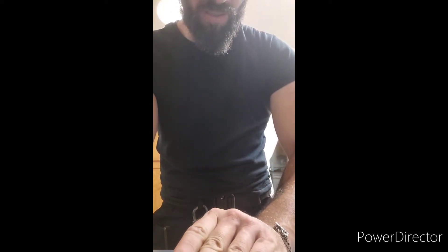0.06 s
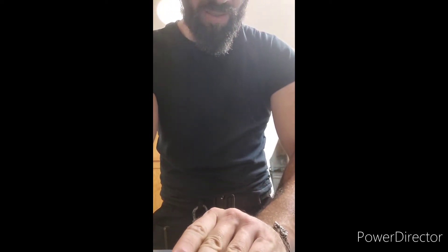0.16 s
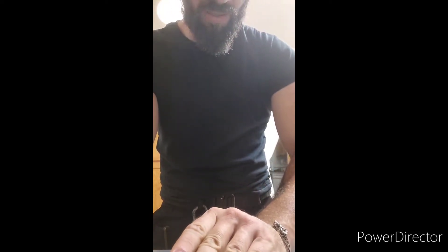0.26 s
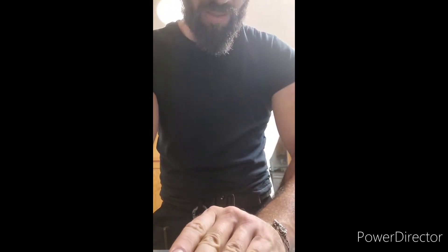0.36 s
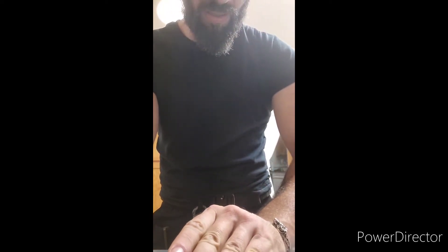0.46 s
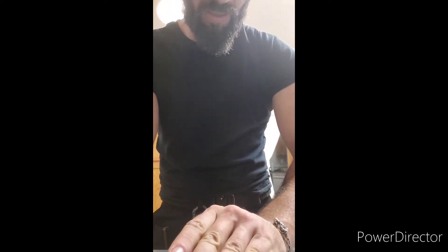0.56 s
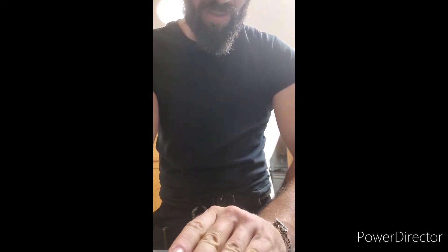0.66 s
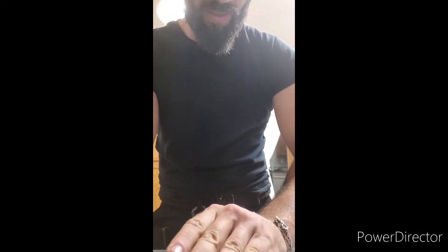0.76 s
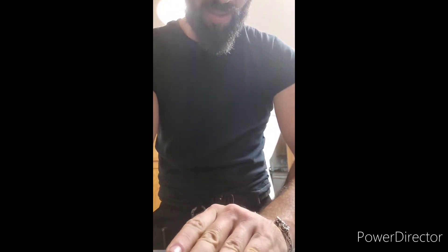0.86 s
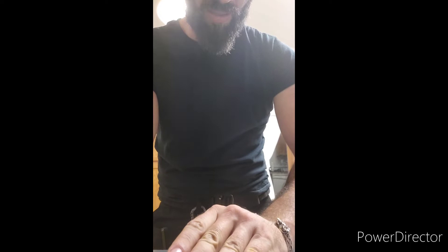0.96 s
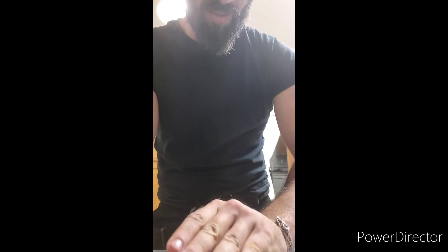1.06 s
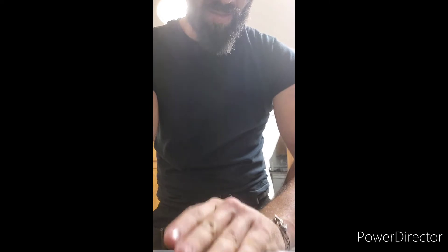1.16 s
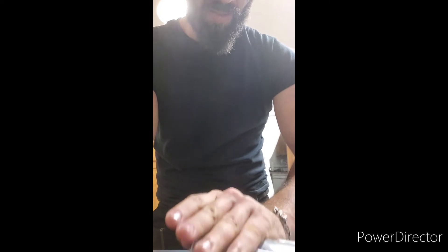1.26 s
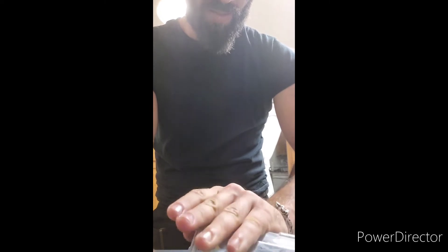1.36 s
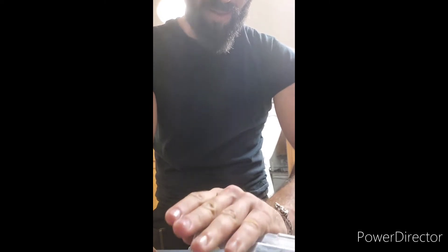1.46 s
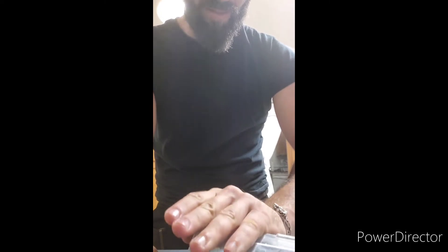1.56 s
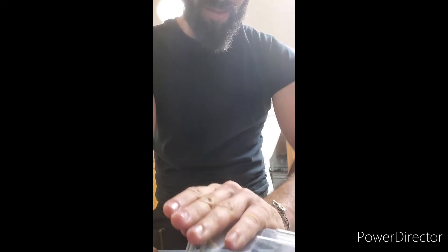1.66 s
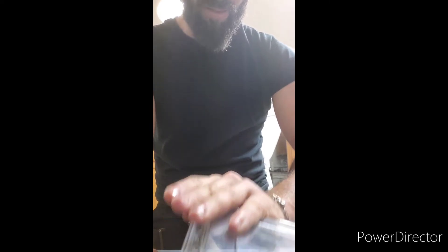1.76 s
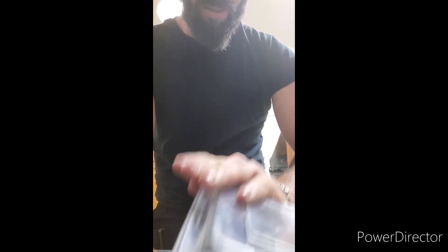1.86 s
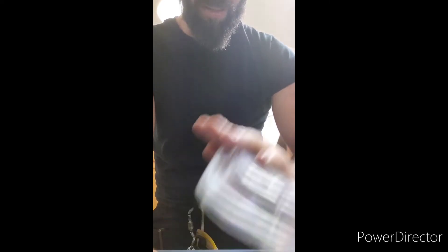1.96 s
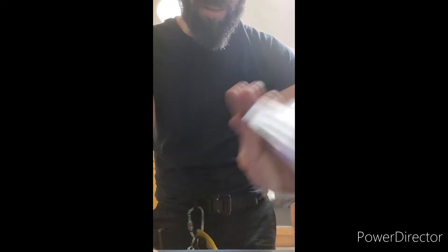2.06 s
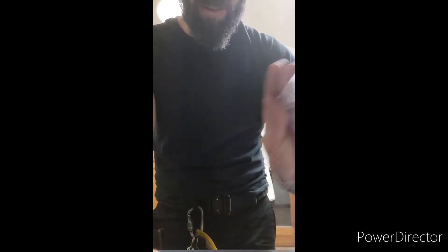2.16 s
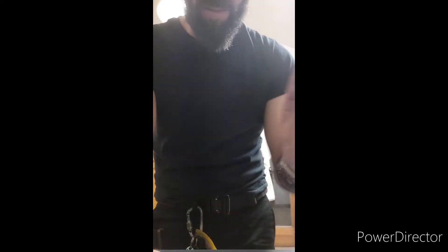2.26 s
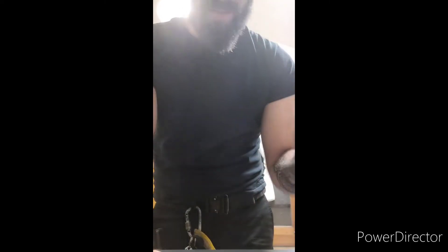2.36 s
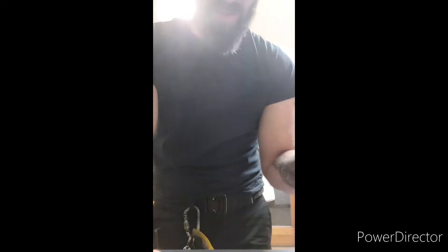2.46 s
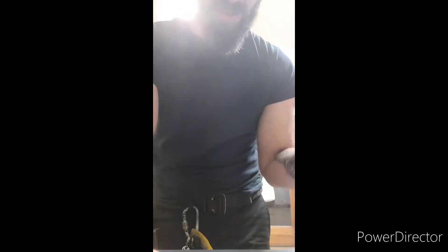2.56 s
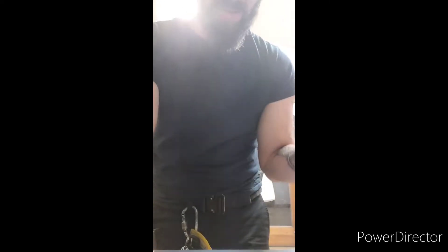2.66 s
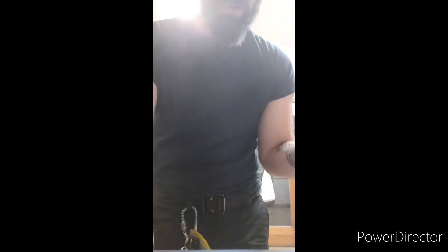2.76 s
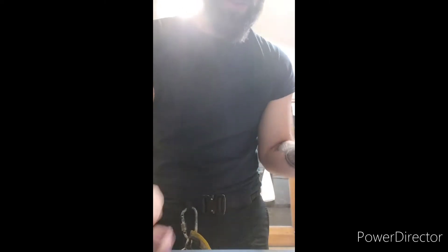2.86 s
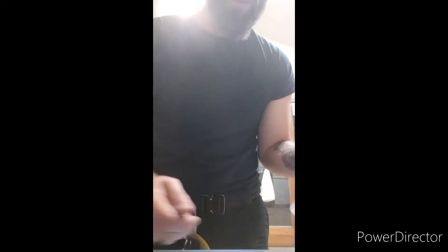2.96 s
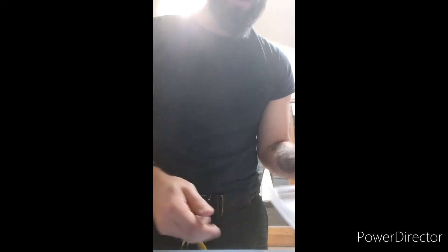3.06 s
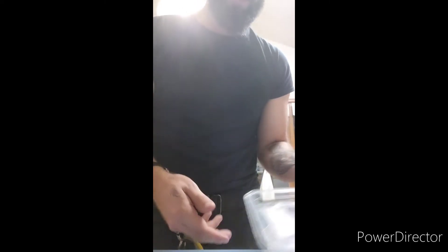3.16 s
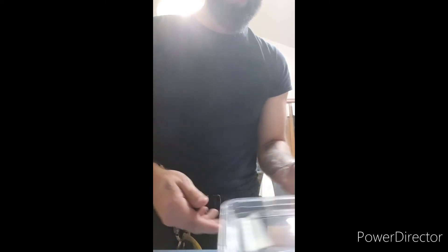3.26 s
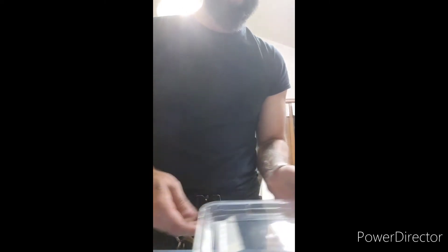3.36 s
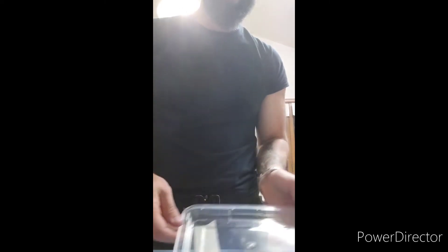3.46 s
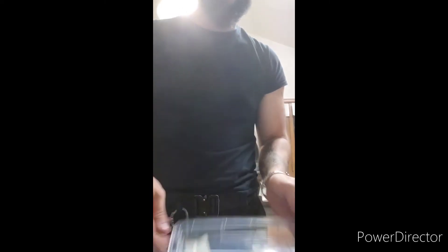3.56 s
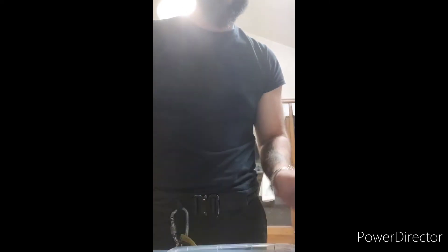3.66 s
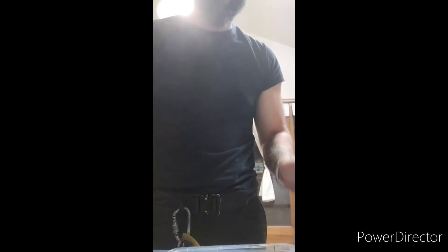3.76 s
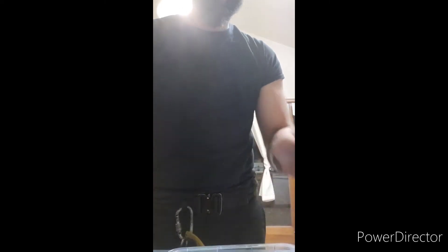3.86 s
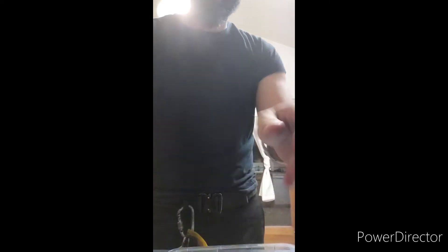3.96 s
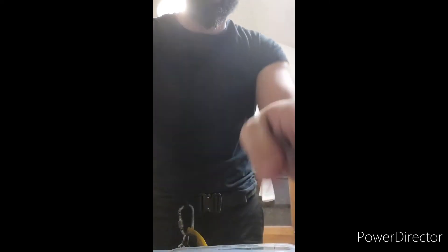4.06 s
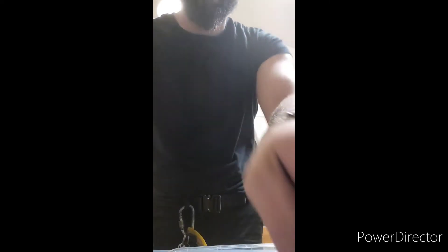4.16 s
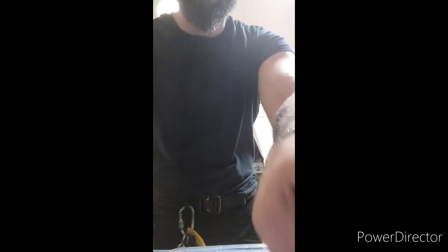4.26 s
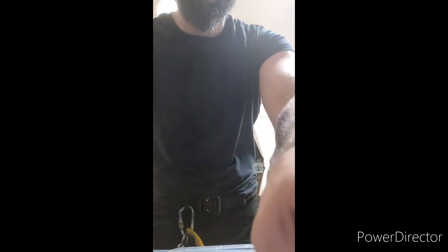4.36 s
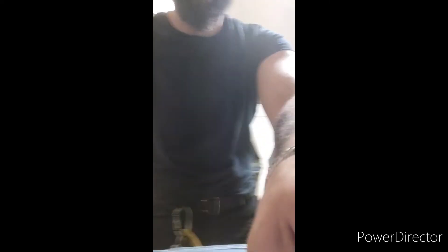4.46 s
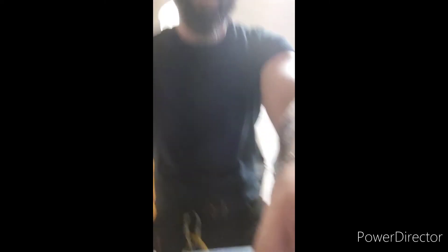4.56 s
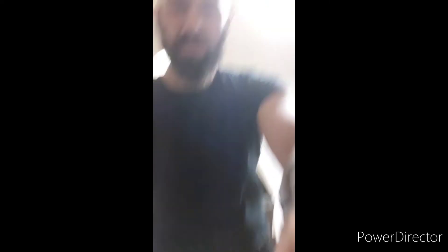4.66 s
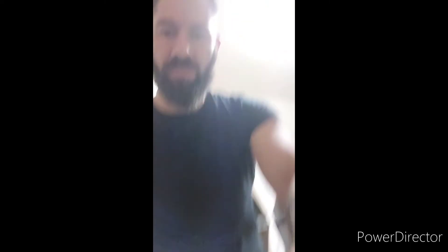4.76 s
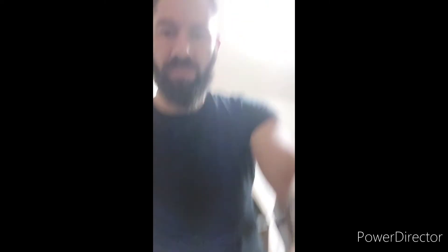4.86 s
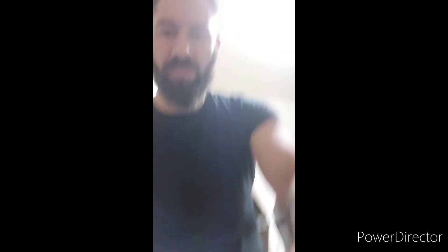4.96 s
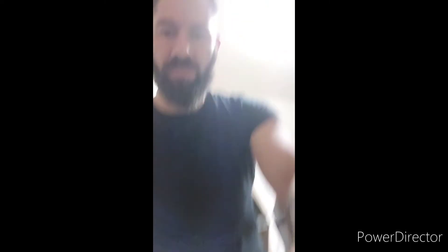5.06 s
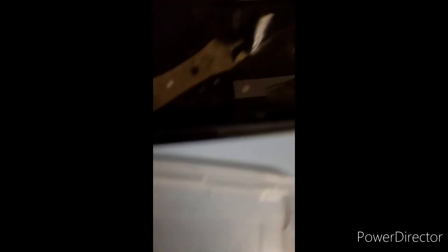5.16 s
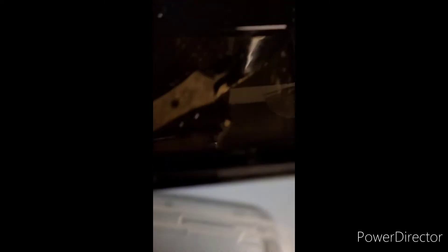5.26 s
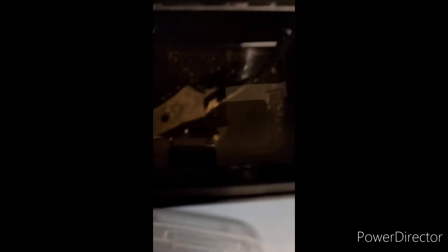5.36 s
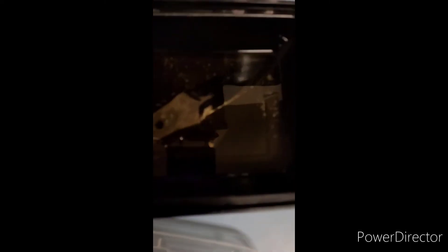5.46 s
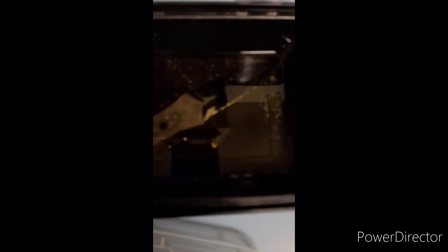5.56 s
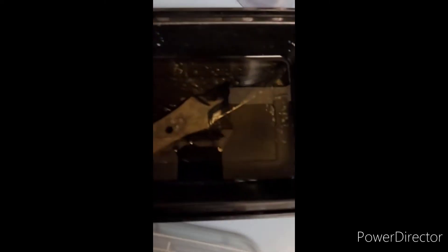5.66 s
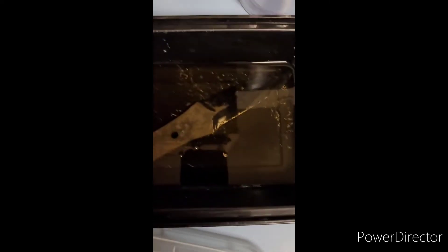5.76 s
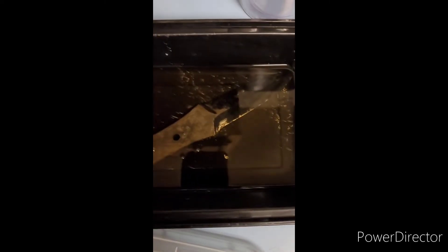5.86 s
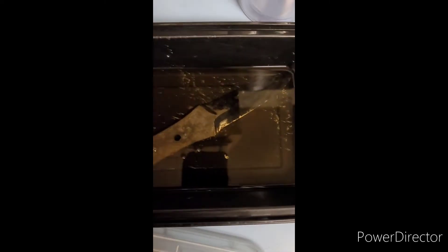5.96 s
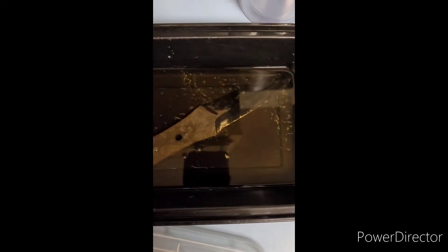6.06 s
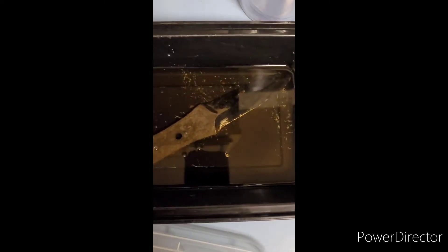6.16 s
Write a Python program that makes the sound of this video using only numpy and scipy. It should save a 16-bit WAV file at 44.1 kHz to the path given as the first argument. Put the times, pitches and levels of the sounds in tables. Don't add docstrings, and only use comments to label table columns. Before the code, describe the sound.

Loud snapping plastic rim, a puff as the seal breaks, box clacking down on a table, then close bumps and rubbing of a handled phone.

```python
import sys
import numpy as np
from scipy import signal
from scipy.fft import rfft, irfft, next_fast_len
from scipy.io import wavfile
from scipy.ndimage import uniform_filter1d, map_coordinates

SR = 44100
rng = np.random.default_rng(int(sys.argv[2]) if len(sys.argv) > 2 else 0)


def store_pcm(level_fs):
    pcm = np.round(np.clip(level_fs, -1, 1) * 32767).astype(np.int16)
    wavfile.write(sys.argv[1], SR, np.atleast_2d(pcm).T)


def gain_from_decibels(decibels):
    exponent = np.asarray(decibels, float) / 20
    return 10 ** exponent


N = 273324


def unit(x):
    return x / np.sqrt(np.mean(x ** 2) + 1e-20)


def along(points, hz):
    f, v = np.transpose(points)
    return np.interp(np.log(hz + 1), np.log(f + 1), v)


def curves(rows):
    s, *cols = np.transpose(rows)
    return [np.interp(np.arange(N) / SR, s, c) for c in cols]


def wobble(rate):
    knots = rng.standard_normal(int(N * rate / SR) + 4)
    return map_coordinates(knots, [np.arange(N) * rate / SR])


def filtered(x, response):
    m = next_fast_len(N + SR // 2)
    return irfft(rfft(x, m) * response(np.fft.rfftfreq(m, 1 / SR)), m)[..., :N]


def noise(spectrum, alike):
    def response(hz):
        turn = np.arccos(np.clip(along(alike, hz), -1, 1)) / 2
        return gain_from_decibels(along(spectrum, hz)) * [np.cos(turn), np.sin(turn)]
    mid, side = filtered(rng.standard_normal((2, N)), response)
    return unit(np.array([mid + side, mid - side]))


def panned(pan_db, share):
    return gain_from_decibels([[share * pan_db / 2], [-share * pan_db / 2]])


# (frequency [Hz], density [dB per Hz])
TREBLE = [(6900, -27.5), (8500, -3.5), (12000, 0.5), (15500, -8.5), (16500, -14)]
BOOM_WET_DB = -3


def blows(table, modes, colour, reach, boom_share, trim_db, t60, own_t60, crack_share):
    out, push, t = np.zeros((2, N + SR)), np.zeros((3, N + SR)), np.arange(SR // 6) / SR
    parts = [noise(c, [(1000, 0.49), (5000, 0.27)]) for c in (colour, TREBLE)]
    body, top = [np.pad(part, ((0, 0), (0, SR))) for part in parts]
    burst = gain_from_decibels(trim_db - 60 * (t / t60) ** 1.093) * (1 - np.exp(-t / 0.00064))
    for s, db, boom_db, hz, pan_db, top_db in table:
        k = round((s + .0007) * SR)
        span = slice(k, k + len(t))
        crack = (body[:, span] + gain_from_decibels(top_db) * top[:, span]) * burst
        ring = 0
        for f, level, decay in modes:
            near = level + rng.normal(0, 0.37) - reach * abs(np.log2(f / hz))
            ring = ring + gain_from_decibels(near - 60 * t / decay) * np.sin(2 * np.pi * f * t)
        struck_panel = 2.7 * gain_from_decibels(-60 * t / own_t60) * np.sin(2 * np.pi * hz * t)
        ring = (ring + struck_panel) * (1 - np.exp(-t / 0.0036))
        ring = gain_from_decibels(db + boom_db) * ring / np.abs(ring).max()
        out[:, span] += gain_from_decibels(db) * crack * panned(pan_db, crack_share) + ring * panned(pan_db, boom_share)
        push[:2, k] += np.linalg.norm(burst) * gain_from_decibels([db, db + top_db])
        push[2, span] += ring
    tint = lambda hz: np.array([unit(gain_from_decibels(along(c, hz))) for c in (colour, TREBLE)])
    return out[:, :N], filtered(push[:2, :N], tint).sum(axis=0) + gain_from_decibels(BOOM_WET_DB) * push[2, :N]


def strokes(table, bright, low, edge, boom_share):
    out, t = np.zeros((2, N)), np.arange(N) / SR
    for s, length, db, low_db, pan_db, swell_db in table:
        a, b = round((s - .02) * SR), round((s + length + 0.027) * SR)
        u = t[a:b] - s
        gate = gain_from_decibels(db + swell_db * (np.clip(u / length, 0, 1) - 1.0))
        gate = gate / (1 + np.exp(-u / edge)) / (1 + np.exp((u - length) / edge))
        gritty = bright[:, a:b] * panned(pan_db, 0.89)
        shaken = gain_from_decibels(low_db) * low[:, a:b] * panned(pan_db, boom_share)
        out[:, a:b] += gate * (gritty + shaken)
    return out


def puffs(table):
    t = np.arange(N) / SR
    return sum(gain_from_decibels(db) * np.cos(2 * np.pi * hz * (t - s)) * np.exp(-((t - s) / half) ** 2)
               for s, db, hz, half in table)


# (time [s], peak level [dB])
BUMPS = [
    (0.78, -64),
    (1.16, -53),
    (1.36, -62),
    (1.62, -34),
    (2.15, -44),
    (2.35, -27),
    (2.75, -47),
    (3.78, -47),
    (4.63, -39.5),
    (5.23, -48),
]
REST_DB, RISE_DB_PER_S, FALL_DB_PER_S = -67, 199.5, 251


def jolts():
    t = np.arange(N) / SR
    swells = sum(gain_from_decibels(db - np.maximum(RISE_DB_PER_S * (s - t), FALL_DB_PER_S * (t - s))) for s, db in BUMPS)
    return gain_from_decibels(REST_DB) + swells


# (time [s], household hum [dB], rustle of clothes [dB])
AIR_LEVELS = [(0.0, -48, -62.5), (1.12, -46.5, -60), (1.9, -52.5, -65), (2.4, -50.5, -59.5),
              (3.4, -54, -67), (3.71, -49.5, -58), (4.81, -50, -63.5), (5.66, -49, -67.5), (5.76, -49, -69),
              (5.8, -47, -63), (5.98, -51, -72.5)]
# (frequency [Hz], density [dB per Hz])
HUM_COLOUR = [(53, -58), (90, -16), (105, -16.5), (164, 1), (199, -6.5), (242, -2.5), (290, -10.5),
              (347, -9), (580, -22.5), (822, -19.5), (958, -24), (2500, -36), (3250, -78), (5500, -120)]
# (frequency [Hz], coherence [0 to 1])
HUM_ALIKE = [(60, 0.56), (180, 1), (550, 0.64), (1650, 0.33), (4970, 0.5), (15000, 0.01)]
# (frequency [Hz], density [dB per Hz])
RUSTLE_COLOUR = [(800, -10), (1800, -4.5), (3000, -7.5), (6000, -5), (7500, -4), (9000, -17)]
# (frequency [Hz], density [dB per Hz])
PORT_HISS = [(1500, -20), (4000, -3), (8500, 0), (12000, -3), (15500, -0.5)]
RUSTLE_TOP_DB, SELF_HISS_DB = -8, -80


def air():
    hum_db, rustle_db = curves(AIR_LEVELS)
    hum = gain_from_decibels(hum_db - 0.5 + 2.08 * wobble(10)) * noise(HUM_COLOUR, HUM_ALIKE) * gain_from_decibels([[-.8], [.8]])
    table_colour = [(20, -51.5), (40, -15.5), (56, 1.0), (75, -8.5), (95, -34.5), (130, -58.0)]
    shudder = jolts() * noise(table_colour, [(60, 0.89)]) * gain_from_decibels([[-2.5], [2.5]])
    hiss = gain_from_decibels(rustle_db + 1.5 + 1.1 * wobble(64)) * noise(RUSTLE_COLOUR, [(1000, 0.04)])
    hiss = hiss + gain_from_decibels(rustle_db + RUSTLE_TOP_DB) * noise(TREBLE, [(1000, .05)])
    hiss = hiss + gain_from_decibels(SELF_HISS_DB) * noise(PORT_HISS, [(1000, .05)])
    return hum + shudder + hiss * gain_from_decibels([[-1.5], [1.5]])


# (frequency [Hz], decay t60 [s])
ROOM_T60 = [(150, 0.25), (500, 0.53), (2000, 0.55), (5000, 0.47), (9000, 0.41), (14000, 0.34)]
# (frequency [Hz], level [dB])
ROOM_TONE = [(100, -2.5), (400, -4.5), (1500, 0.5), (5000, 0.5), (12000, 0), (15000, -4)]
WALL_SCATTER_DB = 2.5


def room(x):
    out, step = np.zeros((2, N + 2 * SR)), SR // 3
    for k in range(0, N, step):
        if np.abs(x[k:k + step]).max() < 1e-5:
            continue
        hz, t, z = signal.stft(rng.standard_normal((3, SR * 3 // 4)), SR, nperseg=256)
        z = z[:2] + z[2] * 600 / (hz[:, None] + 150)
        scatter = unit(uniform_filter1d(rng.standard_normal(z.shape[1:]), size=24, axis=0))
        z = z * gain_from_decibels(WALL_SCATTER_DB * scatter)
        decay = gain_from_decibels(along(ROOM_TONE, hz)[:, None] - 60 * t / along(ROOM_T60, hz)[:, None])
        tails = signal.istft(z * decay, SR, nperseg=256)[1]
        tails = tails * (1 - np.exp(-np.arange(tails.shape[1]) / SR / 0.00049))
        wet = signal.fftconvolve(x[None, k:k + step], tails / np.sqrt(SR / 40), axes=1)
        out[:, k:k + wet.shape[1]] += wet
    return out[:, :N]


# (time [s], left over right [dB])
PLACE = [(0.7, -2.5), (1.15, -8), (1.26, -16), (1.36, -9), (1.62, -16), (1.85, -16), (2.12, -12.5),
         (2.34, 6.5), (2.7, -4.5), (3.08, -9), (3.62, -15), (3.76, -3), (3.82, 1)]


def placed(rows):
    return [(*row[:4], np.interp(row[0], *np.transpose(PLACE)), row[4]) for row in rows]


# (time [s], length [s], level [dB], upper band over it [dB], swell [dB])
DRAG = [
    (3.066, 0.04, -42, 0.5, 13),
]


def drag():
    pair = rng.standard_normal((2, N))
    low, high = [unit(filtered(pair, lambda f: 1 / (1 + ((f - hz) / 170) ** 2))) for hz in (2100, 3030)]
    return strokes(placed(DRAG), low, high, edge=0.004, boom_share=0.64)


# (time [s], fundamental [Hz], level [dB])
SQUEAK = [
    (4.26, 1320, -92),
    (4.3, 1390, -68),
    (4.33, 1370, -59),
    (4.4, 1280, -70),
    (4.44, 1270, -93),
]


def squeak():
    hz, db = curves(SQUEAK)
    turn, t = 2 * np.pi * np.cumsum(hz) / SR, np.arange(N) / SR
    sounding = (t > SQUEAK[0][0]) & (t < SQUEAK[-1][0])
    return gain_from_decibels(db) * sounding * (np.sin(6 * turn) + np.sin(7 * turn)) * gain_from_decibels([[-4], [4]])


# (time [s], tick peak [dB], thump over the tick [dB], thump [Hz], left over right [dB])
TAPS = [(4.497, -26, -18, 197, 11.5), (4.593, -18.5, -3, 363, -8), (4.6118, -36, -26, 237, -16),
        (4.6162, -16.5, -26, 320, -20), (4.6185, -18, -33, 236, -20), (4.7022, -42, 12.5, 323, 35.5),
        (4.74, -49.5, 12.5, 450, 10.5), (4.7692, -44.5, 12.5, 520, 17), (4.7744, -42.5, 14, 460, 13),
        (4.788, -51, 14.5, 599, 13), (4.813, -57, 16, 402, 11), (4.826, -50, 10, 920, 16),
        (4.86, -53.5, 16, 400, 12), (5.186, -56, 14, 450, 10), (5.2094, -59, 14, 170, 10)]
TAP_TREBLE_DB, BRIGHTER_RIGHT = -6.5, 0.31
# (time [s], tick peak [dB], treble over the tick [dB])
LIFTS = [(5.345, -42, -5), (5.359, -30, -10), (5.377, -47, -8), (5.394, -28, 5.5), (5.424, -29, -9),
         (5.429, -27, -8), (5.443, -35, -4), (5.448, -30, -5), (5.462, -50, -8), (5.489, -41, -4),
         (5.518, -44, 12), (5.524, -46, -2), (5.531, -37, -3), (5.5641, -38, 0), (5.567, -45, -2),
         (5.599, -55, 3), (5.603, -46, 2), (5.615, -55, 4), (5.623, -46, 0), (5.89, -61, 0)]
LIFT_THUMP_DB, LIFT_HZ, LIFT_PAN_DB = -25, 200, -6.5
# (time [s], length [s], level [dB], rumble over it [dB], left over right [dB])
SLIDES = [(4.38, 0.22, -52.5, -14, -9), (4.49, 0.095, -58, -17, 14), (4.608, 0.026, -31, -10, -20),
          (4.643, 0.021, -33.5, -6, -35.5), (4.765, .065, -68, 15, 8), (4.691, 0.091, -47.5, -3, -4),
          (4.776, 0.12, -45, -11, -10), (4.992, 0.075, -48.5, -10, -6), (5.083, 0.031, -58, -5, 3),
          (5.129, 0.071, -54, -8, -12), (5.275, 0.051, -44.5, -11, -15), (5.329, 0.14, -54, 0.5, -5),
          (5.46, 0.16, -61.5, -7, -2)]
SLIDE_SWELL_DB = -4.5
# (time [s], peak level [dB], frequency [Hz], half length [s])
PUSHES = [
    (4.602, -36, 110, .004),
    (4.6425, -30, 110, .004),
    (4.7125, -36, 200, .003),
    (4.6555, -33, 1200, .0006),
    (4.661, -35, 2200, .0004),
    (5.36, -58, 1650, .012),
]
# (frequency [Hz], density [dB per Hz])
TICK_COLOUR = [(500, -18), (1500, -2), (3000, -7.5), (5000, -1.5), (7200, 5.5), (8200, 1), (9000, -22)]
# (frequency [Hz], density [dB per Hz])
SKIN_COLOUR = [(300, -71), (1000, -6), (2500, -4), (5000, 5), (7000, 10), (10000, -1), (13000, -5),
               (16000, 0)]
# (frequency [Hz], gain [dB])
COVERED = [(2000, 12.5), (4500, 0), (6000, -23), (12000, -19)]


def fingers():
    # (frequency [Hz], level [dB], decay t60 [s])
    case = [(65.0, -15.0, 0.035), (135.5, -8.5, 0.033), (250, 3.0, 0.016),
            (352.3, 12.5, 0.0066), (702, 2.0, 0.012), (1580, 4.5, 0.0067)]
    hiss = unit(gain_from_decibels(1.6 * wobble(300) + 1.45 * wobble(40)) * noise(SKIN_COLOUR, [(1000, 0.067)]))
    hiss = filtered(hiss, lambda hz: np.array([gain_from_decibels(along(COVERED, hz)), np.ones_like(hz)]))
    rumble_colour = [(30, -17.5), (60, 7), (300, -3.5), (900, -6.5), (2500, -19.0)]
    rumble = unit(gain_from_decibels(6.0 * wobble(50)) * noise(rumble_colour, [(200, 0.4), (900, 0.161)]))
    grips = [(*row, TAP_TREBLE_DB - BRIGHTER_RIGHT * row[-1]) for row in TAPS]
    lifts = [(s, db, LIFT_THUMP_DB, LIFT_HZ, LIFT_PAN_DB, top_db) for s, db, top_db in LIFTS]
    taps = blows(grips + lifts, case, TICK_COLOUR, reach=1.8, boom_share=0.88, trim_db=0.5,
                 t60=0.0064, own_t60=0.01, crack_share=0.92)[0]
    swells = [(*row, SLIDE_SWELL_DB) for row in SLIDES]
    slides = strokes(swells, hiss, rumble, edge=0.0031, boom_share=0.068)
    return -taps - puffs(PUSHES) + slides


# (time [s], peak [dB], low tone [Hz], high tone [Hz], high over low [dB])
SNAPS = [(0.702, -4.5, 830, 5300, 3.5), (0.7013, -5, 1614, 4100, -8), (1.149, -14.5, 705, 4900, -23.5),
         (1.258, -16, 745, 4200, 8.5), (1.284, -15, 834, 4240, 5), (1.545, -23.5, 870, 5900, 1.5),
         (1.6158, -19, 780, 5180, 15), (1.848, -25, 750, 4500, -3.5), (2.219, -32.5, 790, 2000, 5),
         (2.271, -27.5, 720, 2005, -16), (2.298, -3.5, 880, 1900, -21), (2.338, -14, 918, 2546, -5),
         (3.622, -18, 1126, 2190, 0.5), (3.714, -28, 650, 2126, -5.5), (3.7597, -11.5, 733, 2343, 4)]


def rim():
    out, t = np.zeros(N + SR), np.arange(SR // 20) / SR
    for s, db, low_hz, high_hz, high_db in SNAPS:
        low = gain_from_decibels(-60 * t / .017) * np.sin(2 * np.pi * low_hz * t)
        high = gain_from_decibels(high_db + 6 - 60 * t / .006) * np.sin(2 * np.pi * high_hz * t)
        out[round((s + .0007) * SR):][:len(t)] += gain_from_decibels(db - 2.0) * (low + high) * (1 - np.exp(-t / 0.001))
    return out[:N]


# (time [s], peak [dB], frequency [Hz], t60 [s])
RINGS = [(0.7023, -16, 1540, 0.046), (.702, -23.5, 3950, .025), (.702, -19.5, 6970, .012),
         (.705, -34, 505, 0.1), (1.144, -17.5, 713, 0.096), (1.163, -21.5, 462.7, 0.16),
         (1.197, -26, 743, 0.044), (1.196, -24, 1660, .02), (1.289, -33, 475, 0.14),
         (1.352, -10, 890, 0.024), (1.357, -17.5, 189, 0.099), (1.44, -33, 443, 0.2),
         (1.385, -28.5, 200, 0.038), (1.616, -24, 4350, 0.0087), (1.619, -27, 2860, .04),
         (1.705, -34.5, 2980, 0.02), (1.849, -29, 1740, .02), (2.299, -13, 897, .05),
         (2.298, -17.5, 1950, 0.033), (2.299, -12.5, 2980, 0.0084), (2.299, -15.5, 466, 0.036),
         (2.3395, -11, 910, 0.01), (2.22, -32.5, 1690, 0.019), (2.666, -41, 870, 0.025),
         (2.71, -25, 7060, 0.0099), (2.781, -32, 517, 0.009), (2.306, -13, 254.4, 0.045),
         (2.339, -14.5, 2650, 0.016), (2.339, -19, 2056, 0.036), (2.339, -25.5, 3640, 0.016),
         (2.346, -17, 2620, 0.017), (2.346, -22, 2070, 0.025), (2.344, -21, 1016, 0.024),
         (2.343, -17, 296.4, 0.1), (2.376, -27, 970, 0.036), (2.394, -21.5, 2265, 0.0085),
         (2.388, -30, 454, .14), (3.623, -33, 2990, 0.018), (3.622, -30, 4560, .012),
         (3.622, -27.5, 600, 0.018), (3.715, -25, 2100, 0.027), (3.728, -28.5, 3380, .018),
         (3.728, -33.5, 2110, .025), (3.76, -18.5, 3530, 0.015), (3.766, -18.5, 2220, .035),
         (3.766, -17.5, 4200, 0.032), (3.768, -27.5, 450, 0.055), (3.82, -25, 3000, .02),
         (3.82, -25, 2370, .025), (3.815, -21.5, 707, 0.044)]
# (time [s], peak [dB], frequency
# [Hz], t60 [s])
MORE_RINGS = [(.707, -26, 480, .06), (1.3518, -16, 280, .04), (1.3515, -16, 450, .015),
              (2.404, -32, 905, .06), (2.43, -36, 885, .06), (2.46, -38, 900, .05), (2.485, -40, 935, .1),
              (2.558, -43, 915, .05), (2.415, -34, 300, .3), (2.298, -24, 1400, .03),
              (2.628, -45, 870, .03), (2.727, -40, 800, .04), (2.731, -42, 1400, .02),
              (2.76, -43, 800, .05), (2.78, -40, 1350, .02), (2.781, -38, 850, .02), (2.838, -44, 720, .03),
              (2.71, -41, 820, .03)]
RING_RISE = 0.053


def rings():
    out, t = np.zeros(N + SR), np.arange(SR // 4) / SR
    for s, db, hz, t60 in RINGS + MORE_RINGS:
        rise = 1 - np.exp(-t / (RING_RISE * t60))
        out[round(s * SR):][:len(t)] -= gain_from_decibels(db - 60 * t / t60) * np.sin(2 * np.pi * hz * t) * rise
    return out[:N]


# (time [s], peak level [dB])
SPIKES = [
    (.7033, -12),
    (1.2843, -22),
    (1.6165, -16),
    (2.2995, -14),
    (3.6225, -24),
    (3.7612, -8),
    (3.767, -12),
]
SPIKE_S = .00006


def spikes():
    t = np.arange(N) / SR
    return sum(gain_from_decibels(db) * (1 - 2 * ((t - s) / SPIKE_S) ** 2) * np.exp(-((t - s) / SPIKE_S) ** 2)
               for s, db in SPIKES)


# (time [s], peak [dB], boom over the crack [dB], boom [Hz], treble over the crack [dB])
CRACKS = [(0.7016, -6.5, -11, 507, 3), (1.3512, -10.5, 7, 454, 0), (1.5273, -22, -8, 219, 1.5),
          (1.5453, -14.5, -12, 550, -3.5), (1.6152, -14, -10.5, 149, -23), (1.705, -37, 4.5, 182, 1),
          (1.8488, -28, -8.5, 276, -8.5), (2.1148, -35, 0.5, 754, -9), (2.2986, -5.5, -4, 903, 4.5),
          (2.3099, -26.5, 9.5, 238, 19), (2.338, -9, -7, 454, 0.5), (2.3928, -23.5, -1, 407, 2.5),
          (2.5935, -52, -8, 353, 13), (2.7092, -28.5, -5.5, 230, -4), (2.9472, -38, 0.5, 276, -1),
          (3.3715, -61, -3, 292, 18), (3.7597, -5.5, -13, 787, -3), (4.093, -40, -3, 187, -4)]
# (time [s], peak [dB], boom over the click [dB], boom [Hz])
CLICKS = [(1.257, -12, -15.5, 717), (1.2825, -17.5, -12, 491), (1.5563, -16.5, -3.5, 482),
          (1.575, -29.5, -10, 800), (1.6227, -18, -15, 476), (2.165, -42.5, -2, 400), (2.682, -44, -5, 494),
          (2.1488, -42, -4.5, 278), (2.2192, -30, -7.5, 800), (3.081, -33, -11, 253),
          (3.106, -34, -14, 253), (3.6213, -29, -10.5, 809), (3.715, -21, -10, 245),
          (3.7274, -22, -15, 255), (3.743, -30.5, -18.5, 676), (3.7656, -4, -17, 485),
          (3.781, -14, -22.5, 441), (3.82, -14.5, -14.5, 262), (3.934, -29, -13.5, 430)]
# (time [s], contact peak [dB], boom over it [dB], boom [Hz])
KNOCKS = [(1.1456, -15, 4, 430), (1.158, -35, 17.5, 470), (1.1979, -26.5, 5, 440), (1.387, -36.5, -14, 440),
          (1.565, -37, 14, 216), (1.6308, -44, 14, 215), (2.3456, -18, 1.5, 279), (2.6613, -41.5, 5, 167),
          (2.7225, -41, 9.5, 157), (2.7335, -43.5, 0, 380), (2.765, -45, -1, 293), (2.779, -31, 1, 250),
          (3.418, -49, 3.5, 157), (3.8126, -21, -9.5, 722)]
CLICK_TREBLE_DB, KNOCK_TREBLE_DB = -11.5, -9
# (time [s], length [s], level [dB], boom over it [dB], swell start to end [dB])
SCRAPES = [(1.128, 0.021, -24, 10.5, 37), (1.16, 0.045, -44.5, 19.5, 43), (1.47, 0.061, -57.5, -4, -12),
           (1.528, 0.05, -34.5, 3, -3.5), (1.619, 0.012, -28, -14, -10), (1.675, 0.032, -38.5, 8, 30),
           (1.601, .012, -46, -16, 1), (2.025, 0.054, -52, -2, 9), (2.09, 0.02, -54, -2, 1),
           (2.114, .02, -44, 4.5, 1.5), (2.155, 0.058, -53, -2.5, -1), (2.225, 0.015, -55, 0, -7),
           (2.57, 0.015, -50, 2.5, 12), (2.675, 0.082, -48, 5, 10), (2.83, 0.06, -55, -15, -9),
           (2.945, 0.023, -47, 0.5, 22), (3.055, 0.054, -38.5, -6, 10), (3.42, 0.12, -63, -10, 0),
           (3.567, 0.024, -55, -15, 4), (3.715, 0.039, -54, 10, -10), (3.8, 0.024, -42.5, 6, 9)]
# (time [s], peak [dB], frequency [Hz], half length [s])
PUFFS = [
    (1.1547, -8, 200, .0035),
    (1.633, -22.5, 165, 0.0075),
]
# (frequency [Hz], level [dB], decay t60 [s])
BOX_MODES = [(164.5, 5.5, 0.041), (234.8, 9, 0.046), (273.6, -8, 0.13), (437.6, 0.5, 0.07),
             (469, -4.5, 0.07), (579, -11, 0.11), (705, 3.5, 0.034), (870, -3, 0.04), (960, -31, .03),
             (1540, -12.5, 0.0067), (2170, -17, 0.016)]
# (frequency [Hz], density [dB per Hz])
RIM_COLOUR = [(300, -37.5), (700, -0.5), (1600, 4.5), (2900, 0.5), (3900, 5), (5000, 6.5), (7500, 7.5),
              (8700, -21)]
# (frequency [Hz], density [dB per Hz])
GRIT_COLOUR = [(300, -29.5), (700, -7.5), (1500, -19.5), (2500, -6), (3400, -13), (5000, -3), (7500, -2.5),
               (12000, -7), (16000, -5.5)]
TONES_WET, TONES_FOLLOW = .38, .2
DRIER_NEAR = 0.44


def lid():
    def walls(f):
        return sum(gain_from_decibels(db) * 1j * f * 4 / d / (c * c - f * f + 1j * f * 4 / d) for c, db, d in BOX_MODES)
    shake = unit(filtered(noise([(100, 0)], [(300, 0.52), (1500, 0.23)]), walls))
    grit = noise(GRIT_COLOUR, [(1000, 0.44), (4000, 0.11)])
    grit = unit(gain_from_decibels(0.47 * wobble(400) + 2.1 * wobble(120)) * grit)
    scrapes = strokes(placed(SCRAPES), grit, shake, edge=0.0024, boom_share=0.51)
    clicks = [(*row, CLICK_TREBLE_DB) for row in CLICKS]
    knocks = [(*row, KNOCK_TREBLE_DB) for row in KNOCKS]
    cracks, push = blows(placed(CRACKS + clicks + knocks), BOX_MODES, RIM_COLOUR, reach=3.5, boom_share=0.72,
                         trim_db=-1, t60=0.015, own_t60=0.037, crack_share=0.83)
    tones = rim() + puffs(PUFFS) + rings() + spikes()
    place_db = curves(PLACE)[0]
    tone_gain = gain_from_decibels(np.array([[.5], [-.5]]) * (TONES_FOLLOW * place_db - 6.8))
    sent = (push + TONES_WET * tones + scrapes.mean(axis=0)) * gain_from_decibels(-DRIER_NEAR * np.abs(place_db))
    wet = gain_from_decibels(-5.5) * room(sent) * gain_from_decibels([[-1.5], [1.5]])
    return cracks + scrapes + tones * tone_gain + wet


# (time [s], lag [s])
LEFT_LAG = [(.7, 0.00027), (1.2, 0.0002), (1.42, .00022), (1.52, 0.00017), (1.9, 0.00011), (2.2, 0.00005),
            (4.4, 0.000044), (4.55, 0.00036)]


def scene():
    near = lid() + fingers() + squeak()
    heard = np.clip(np.arange(N) - SR * curves(LEFT_LAG)[0], 0, N - 1)
    left = map_coordinates(near[0], [heard])
    return np.array([left, near[1]]) + air() + drag()


def low_pass(x):
    return signal.sosfilt(signal.butter(12, 16730, fs=SR, output="sos"), x)


# (frequency [Hz], gain [dB])
LEFT_PORT = [(200, -1), (500, 0), (3000, -1), (6000, -10.5), (8500, -12.5), (11000, -11.5), (14000, -25),
             (16000, -14.5)]
# (frequency [Hz], gain [dB])
RIGHT_PORT = [(200, -1.5), (500, 3), (3000, -2), (6500, -5.5), (7500, -8.5), (8100, -12), (8800, -11.5),
              (10500, -5), (12500, -2), (14500, -7), (16000, -12.5)]


def record(dry):
    def port_response(hz):
        return hz ** 2 / (hz ** 2 + 30 ** 2) * gain_from_decibels([along(LEFT_PORT, hz), along(RIGHT_PORT, hz)])
    ports = np.clip(filtered(dry, port_response), -.9, .9)
    mix = filtered(ports, lambda hz: gain_from_decibels(np.interp(hz, [15450, 15800, 16400, 16700], [0, -18, -20, -90])))
    return low_pass(mix)


dry = scene()
out = record(dry)
store_pcm(out)
```